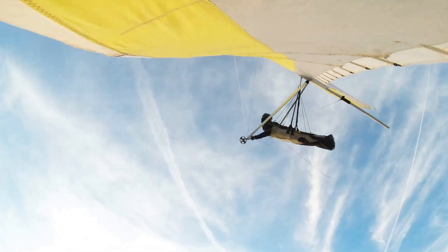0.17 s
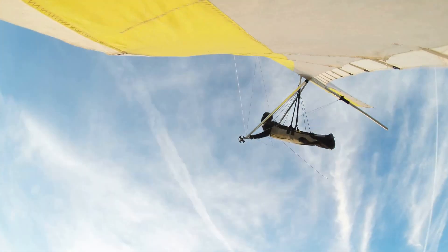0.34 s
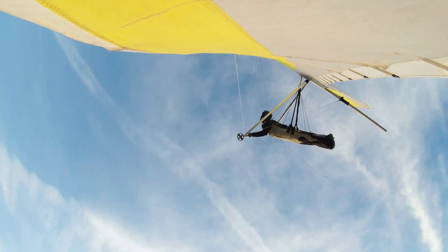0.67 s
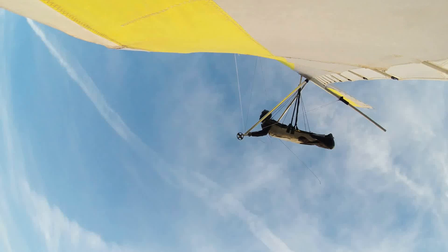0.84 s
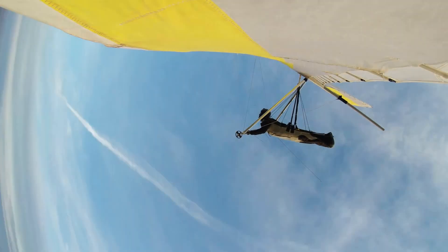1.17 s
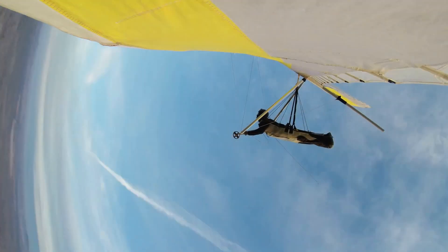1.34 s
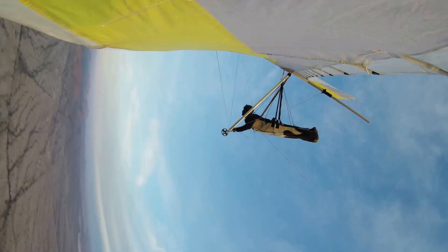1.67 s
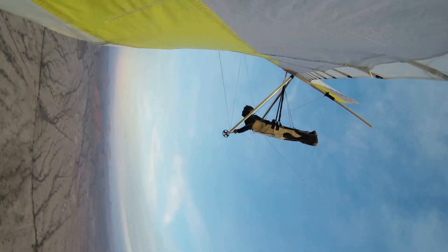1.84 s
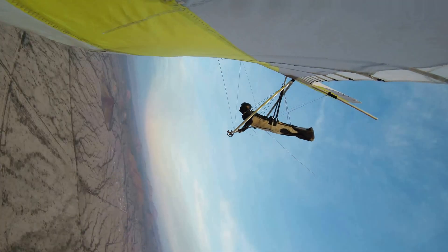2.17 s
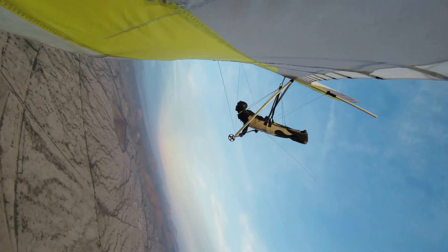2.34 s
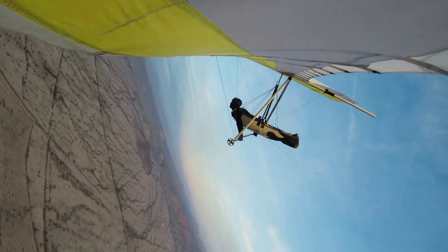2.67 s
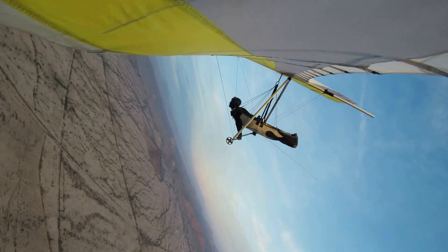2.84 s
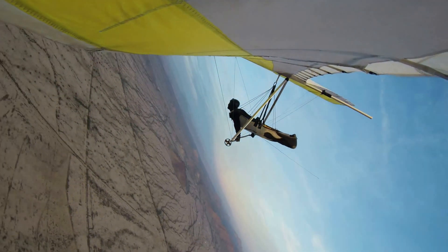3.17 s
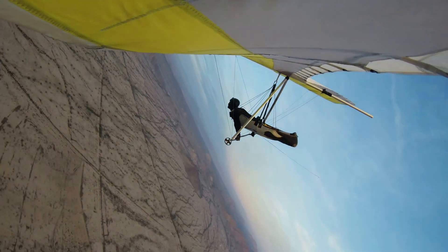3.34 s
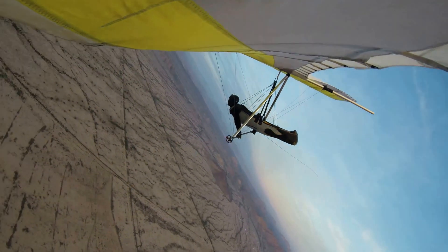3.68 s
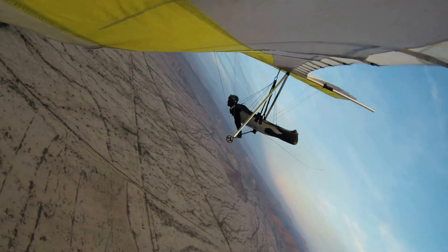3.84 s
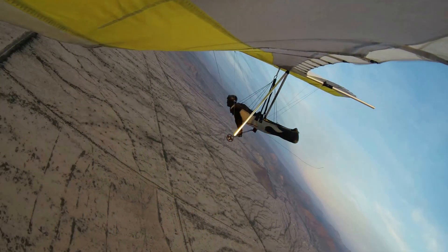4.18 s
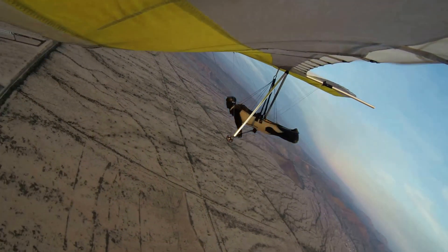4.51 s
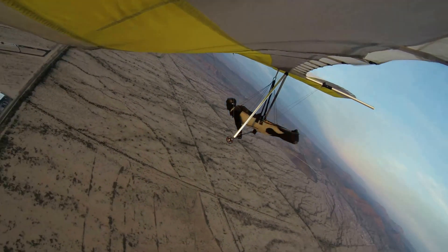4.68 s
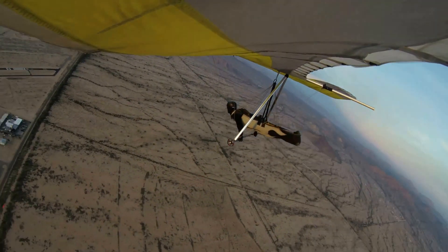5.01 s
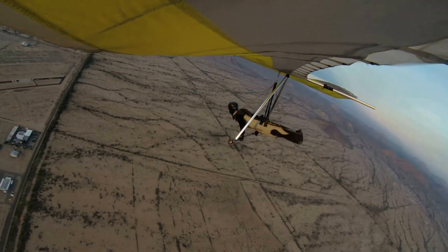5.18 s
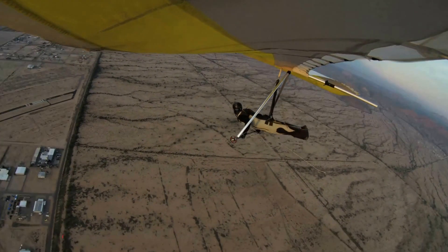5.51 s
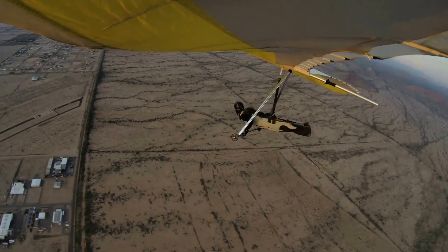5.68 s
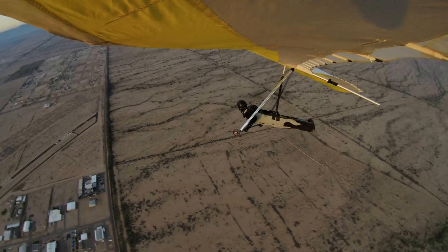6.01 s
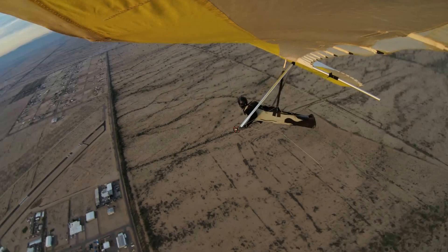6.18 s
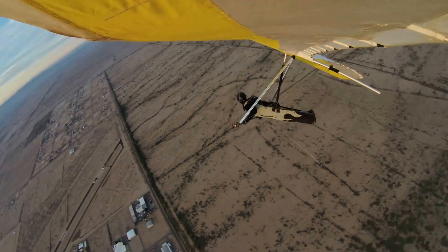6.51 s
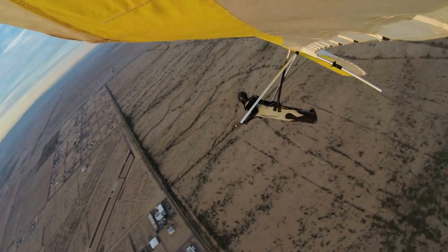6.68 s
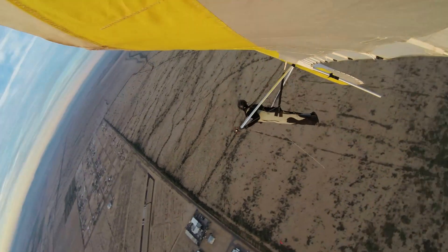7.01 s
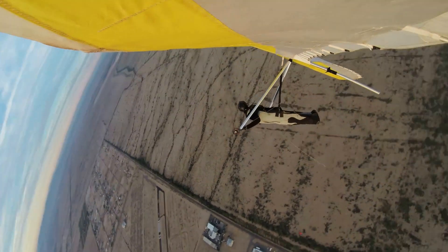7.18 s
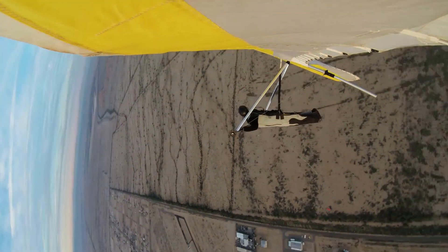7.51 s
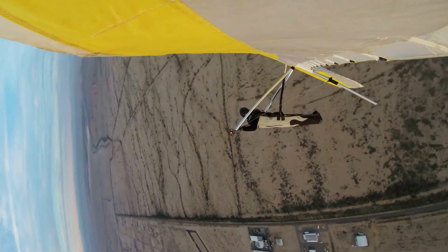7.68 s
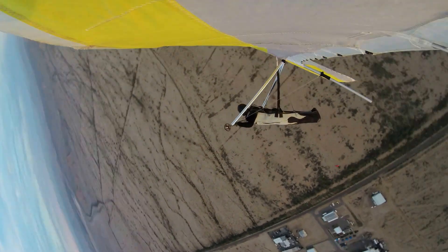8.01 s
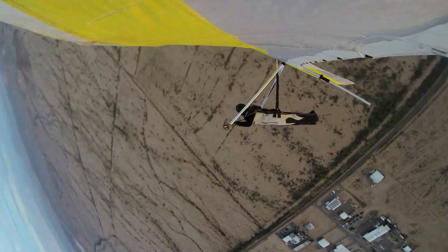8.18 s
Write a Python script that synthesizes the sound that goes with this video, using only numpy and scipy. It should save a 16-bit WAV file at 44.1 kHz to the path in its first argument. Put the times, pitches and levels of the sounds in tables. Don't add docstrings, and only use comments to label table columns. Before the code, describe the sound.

A continuous, close rush of wind on a housed camera fixed to a hang glider wing, with no distant ambience. From 0 to 1.2 s a rumbling, fluttering buffet and soft cloth noise ease down while the hiss thins. Around 1.3 s a hollow, leaky airflow comes forward and a thin, wavering two-toned whistle climbs, flickers, then sinks and vanishes by 1.9 s. The rush builds, jumping brighter at about 2.3 s, and the taut sail drums strongly from 2.7 s. From 3 to 6 s it is a dense, steady roar: deep frame throbbing, fast trailing-edge beating, humming cloth and gusty hiss, slightly easing after 3.5 s. A short low thump lands near 6.1 s. The sail drumming then fades, low pulses swell around 7.5 s, and from 7.8 s the hiss brightens over low throbbing until the end at 8.3 s.

```python
import sys
import numpy as np
from scipy import signal
from scipy.fft import rfft, irfft, next_fast_len
from scipy.io import wavfile
from scipy.ndimage import uniform_filter1d, minimum_filter1d, map_coordinates

SR = 44100
rng = np.random.default_rng(int(sys.argv[2]) if len(sys.argv) > 2 else 0)


def boost_factor(decibels):
    exponent = np.asarray(decibels, float) / 20
    return 10 ** exponent


def log_audio(samples):
    frames = np.atleast_2d(samples).T
    limited = np.clip(frames, -1, 1)
    pcm = np.round(limited * 32767).astype(np.int16)
    wavfile.write(sys.argv[1], SR, pcm)


N = 367794


def unit(x):
    return x / np.sqrt(np.mean(np.abs(x) ** 2) + 1e-20)


def curves(rows):
    s, *columns = np.transpose(rows)
    return [np.interp(np.arange(N) / SR, s, column) for column in columns]


def spells(rows):
    t = np.arange(0, N / SR + .01, .004)
    s, db, half_s = np.transpose(rows)[:, :, None]
    bells = db * np.exp(-((t - s) / half_s) ** 2)
    return np.interp(np.arange(N) / SR, t, bells.sum(axis=0))


def wobble(rate_hz):
    knots = rng.standard_normal(1500)
    return map_coordinates(knots, [np.arange(N) * rate_hz / SR])


def eddies(spectrum, patchy_db):
    z = signal.stft(rng.standard_normal(N), nperseg=512)[2]
    field = uniform_filter1d(rng.standard_normal(z.shape), size=6, axis=0)
    field = uniform_filter1d(field, size=6, axis=1)
    x = signal.istft(z * boost_factor(patchy_db * unit(field)), nperseg=512)[1][:N]
    m = next_fast_len(N + 8192)
    hz, db = np.transpose(spectrum)
    colour_db = np.interp(np.log(np.fft.rfftfreq(m, 1 / SR) + 1), np.log(hz + 1), db, -120, -120)
    return unit(irfft(rfft(x, m) * boost_factor(colour_db), m)[:N])


def shaken(hz, width_hz, lock):
    pole = np.exp(-np.pi * width_hz / SR)
    swing = rng.standard_normal(N + SR) + 1j * rng.standard_normal(N + SR)
    for _ in range(2):
        swing = signal.lfilter([1], [1, -pole], swing)
    swing = unit(swing[SR:])
    swing = swing / (np.abs(swing) + 0.25) ** lock
    carrier = np.exp(2j * np.pi * np.cumsum(hz * np.ones(N)) / SR)
    return unit(swing * carrier) * np.sqrt(2)


# time in seconds, strength in dB.
SHAKE = [(0, -18), (.5, -20), (.7, -26), (1.0, -27.5), (1.2, -27.5), (1.35, -27.5), (1.5, -22), (2.3, -20),
         (3.2, -20.5), (4.2, -21), (5.2, -20), (6.1, -21), (7.0, -20), (7.9, -20.5), (8.34, -23.5)]
# time in seconds, pitch in Hz.
BENDING = [(0, 66), (.75, 70), (1.1, 68), (1.55, 65), (1.75, 56), (2.0, 64), (2.2, 66), (2.8, 68),
           (3.3, 62), (5.2, 61), (6.5, 64), (7.3, 61), (8.34, 64)]
# centre in seconds, dB, half length in seconds.
BEND_SPELLS = [(.22, -4, 0.14), (.8, 6, 0.071), (1.0, 5, 0.12), (1.15, -16, 0.066), (1.55, 7.5, 0.044),
               (1.75, 5, .05), (2.25, 1, 0.2), (2.8, 7, 0.12), (3.74, 7, 0.072), (4.22, -13, 0.055),
               (4.5, 1, 0.053), (5.3, 3.5, .15), (2.6, -5, .04), (3.05, -5, 0.089), (4.75, -5, .08),
               (5.97, 6, 0.026), (6.15, 5, 0.063), (6.3, -11, 0.061), (6.55, 7, 0.041), (6.95, -20, 0.14),
               (7.27, 7.5, .07), (7.4, 6, .06), (7.53, 10.5, 0.06), (7.66, -2, .03), (7.78, 10, 0.066),
               (.15, -4, .07), (2.65, 5, .05), (4.47, 4.5, .05), (2.42, 1, 0.07), (2.53, 6.5, .04),
               (.4, -6, .08), (7.97, -21, 0.062), (8.18, 13, 0.29)]
# Hz, level in dB per Hz.
BUFFET = [(8, -16), (16, -8), (25, -6), (35, 1), (50, 5), (75, 1.5), (100, -4.5), (130, -41)]
# centre in seconds, dB, half length in seconds.
BUFFET_SPELLS = [(.1, 0.5, 0.2), (.42, -4, .1), (1.42, 3.5, .06), (6.04, -4, .03), (4.47, 4, .05),
                 (2.35, 0, .05), (1.6, -4.5, 0.11), (1.8, 6.5, 0.11), (2.2, 7, .1), (3.0, 3.5, .15),
                 (3.75, -6, 0.13), (4.25, -7, .1), (4.85, -5, .08), (5.75, -3, 0.073), (5.98, 8, .03),
                 (6.11, 16, 0.026), (6.85, 1, .1), (7.95, 7.5, 0.043), (8.15, 1.5, 0.16)]


def frame():
    shake_db, = curves(SHAKE)
    bend_db = shake_db - 2.0 + spells(BEND_SPELLS) + 0.5 * wobble(13.0)
    bend = boost_factor(bend_db) * shaken(*curves(BENDING), width_hz=5.2, lock=0.86).real
    buffet_db = shake_db - 1.5 + spells(BUFFET_SPELLS) + 1.7 * wobble(7.9)
    return boost_factor(buffet_db) * eddies(BUFFET, patchy_db=1.9) + bend


# time in seconds, rate in Hz.
BEAT = [(0, 39.5), (.6, 39), (1, 35.5), (1.5, 37.5), (1.9, 38), (2.15, 34.5), (2.6, 39.5), (3.3, 43),
        (4.5, 44.5), (5.7, 46), (6.5, 42), (7.5, 40.5), (8.34, 37)]
# centre in seconds, dB, half length in seconds.
FLAP_SPELLS = [(.25, 5, 0.22), (.39, -3, .06), (.66, -6, .05), (6.05, -5, .08), (2.9, -5, .1),
               (.85, -31, 0.24), (1.3, -2, .12), (1.9, 0, .08), (2.3, -5, 0.087), (2.7, -10, .05),
               (3.2, 4, .12), (3.9, 7.5, 0.099), (4.05, -6, 0.055), (4.7, 1, .08), (5.17, -5, .07),
               (5.4, 9, 0.15), (6.12, -2, .1), (6.6, -7, 0.074), (6.75, 1, .06), (7.8, 6, 0.26),
               (8.2, -14, 0.15)]
# centre in seconds, dB, half length in seconds.
OVERTONE_SPELLS = [(.15, -1, 0.12), (.45, 6.5, 0.23), (1.15, -12, 0.063), (1.3, 6, 0.046), (3.35, 4, 0.15),
                   (3.9, 2, 0.16), (4.9, 2.5, .2), (5.5, -2, 0.15), (1.9, 4, 0.067), (2.25, 0, 0.11),
                   (2.47, 7, 0.15), (3.07, -13, 0.066), (3.62, -19, 0.073), (5.2, -7, 0.048),
                   (6.0, -13, 0.045), (6.4, 5.5, 0.17), (6.74, 1.5, 0.044), (6.87, -12, 0.032),
                   (7.05, 3, 0.086), (7.8, -1.5, 0.25), (8.25, -1, 0.074)]


def flap():
    shake_db, = curves(SHAKE)
    stroke = shaken(*curves(BEAT), width_hz=3.4, lock=0.86)
    first_db = shake_db - 4.0 + spells(FLAP_SPELLS) + 1.6 * wobble(8)
    second_db = shake_db - 3.5 + spells(OVERTONE_SPELLS)
    return boost_factor(first_db) * stroke.real + boost_factor(second_db) * unit((stroke ** 2).real)


# time in seconds, strength in dB.
LOAD = [(0, -26), (.5, -30.5), (.7, -34), (1.2, -36.5), (1.35, -33), (1.6, -32), (2.25, -24.5),
        (2.8, -18.5), (3.4, -19), (3.65, -19.5), (4.6, -20), (5.9, -19), (6.6, -23), (7.15, -28),
        (7.45, -32), (8.0, -34), (8.34, -38)]
# time in seconds, low mode in Hz, high mode in Hz.
TENSION = [(0, 170, 205), (.5, 170, 208), (1.6, 168, 215), (2.0, 174, 215), (2.35, 156, 208),
           (2.6, 160, 192), (2.75, 168, 185), (2.95, 170, 206), (3.3, 172, 216), (4.1, 175, 220),
           (4.6, 175, 215), (4.95, 176, 227), (5.17, 174, 201), (5.7, 172, 227), (6.0, 170, 215),
           (6.5, 171, 215), (7.05, 170, 208), (7.8, 163, 210), (8.34, 165, 205)]
# centre in seconds, dB, half length in seconds.
LOW_DRUM_SPELLS = [(1.2, -6, .04), (1.6, 5, 0.27), (2.47, 2, 0.11), (2.73, -5, .07), (2.9, -3, 0.04),
                   (3.03, -4, .04), (2.19, -7, .08), (0.22, 2, .06), (4.72, -2.5, .08), (2.38, -6, 0.056),
                   (2.17, 9, 0.047), (7.87, 4, .04), (2.4, -5, .03), (3.15, -1, 0.066), (3.33, 7.5, 0.038),
                   (3.2, -12, 0.057), (3.44, 1.5, 0.12), (3.88, 4.5, 0.33), (3.8, -7, 0.069),
                   (4.3, -4, .06), (4.62, 2.5, 0.15), (4.85, -5, 0.055), (5.13, -5.5, 0.29),
                   (5.59, -6, 0.29), (5.87, 4.5, 0.054), (6.05, -20, 0.088), (6.9, 8, 0.077),
                   (7.13, 6.5, 0.046), (7.43, -12, 0.072), (7.83, 6, 0.11)]
# centre in seconds, dB, half length in seconds.
HIGH_DRUM_SPELLS = [(.08, -10, 0.084), (.45, 11, 0.044), (2.0, -6, 0.17), (2.75, 7, 0.082),
                    (2.86, -1, 0.027), (2.95, 6, 0.037), (3.01, -10.5, 0.032), (3.08, 2, .04),
                    (3.22, 5, 0.026), (.22, 3, .06), (7.6, 3.5, 0.046), (8.14, -6, .06), (2.72, -3.5, .04),
                    (3.14, -3, .03), (3.45, 2, .06), (6.45, -3, 0.067), (5.2, 0, 0.072), (7.45, -4, .06),
                    (3.3, 3.5, 0.17), (3.6, -8.5, 0.081), (4.0, -10, 0.055), (4.15, 4, 0.19),
                    (4.55, -3, 0.13), (4.85, 4.5, 0.024), (5.05, -5.5, 0.066), (5.22, 8, 0.035),
                    (5.42, -5, 0.05), (5.72, 5, 0.044), (5.86, 3, 0.033), (6.02, 8.5, 0.066),
                    (6.3, 3, 0.14), (6.5, 4, 0.096), (7.45, -4, 0.092), (6.95, -10, 0.037),
                    (7.05, 13, 0.039), (7.9, -6, 0.19)]
# centre in seconds, dB, half length in seconds.
CLOTH_SPELLS = [(.1, 8, 0.29), (0.78, -2, 0.17), (1.23, -2, 0.39), (1.8, 0, 0.14), (2.16, -2, 0.11),
                (2.5, 3.5, 0.074), (2.77, 3, .08), (4.5, 4.5, .1), (6.35, -3.5, 0.12), (7.3, 2.5, .08),
                (2.6, 2, 0.072), (3.33, 4, 0.074), (3.7, -0.5, 0.45), (5.6, 1.5, 0.16), (5.32, 1, 0.23),
                (6.0, -10, 0.11), (7.2, 0.5, 0.22), (8.34, 5.5, 0.15), (8.12, -2, 0.073), (6.5, -1, .06),
                (5.2, 2.5, .08), (.03, -3.5, .06)]
# Hz, level in dB per Hz.
FLUTTER = [(56, -29), (95, -5.5), (124, -7), (157, -5), (204, -3.5), (232, -9.5), (260, -18), (340, -32.5),
           (570, -120)]
# Hz, level in dB per Hz.
RUSTLE = [(150, -15.5), (250, -3), (264, -9.5), (301, -14), (349, -5.5), (410, -19.5), (620, -23.5),
          (810, -54), (1360, -120)]


def sail():
    load_db, = curves(LOAD)
    loose_db = spells(CLOTH_SPELLS)
    low_hz, high_hz = curves(TENSION)
    low_db = load_db - 0.5 + spells(LOW_DRUM_SPELLS)
    high_db = load_db - 1.25 + spells(HIGH_DRUM_SPELLS)
    drum = boost_factor(low_db) * shaken(low_hz, width_hz=13.6, lock=0.7).real
    drum += boost_factor(high_db) * shaken(high_hz, width_hz=20.4, lock=0.42).real
    flutter_db = -25.0 + 0.6 * (load_db + 26.5) + 0.92 * loose_db + 1.1 * wobble(4.9)
    rustle_db = -38.5 + 0.74 * (load_db + 25.5) + 0.96 * loose_db + 1.0 * wobble(11)
    flutter = boost_factor(flutter_db) * eddies(FLUTTER, patchy_db=-2.0)
    rustle = boost_factor(rustle_db) * eddies(RUSTLE, patchy_db=0.7)
    return drum + flutter + rustle


# Hz, level in dB per Hz.
SURGE = [(6, -20), (16, -9), (25, -1), (31, -1), (40, -29)]


def wake():
    shake_db, = curves(SHAKE)
    return boost_factor(shake_db - 14.5 + 1.5 * wobble(5)) * eddies(SURGE, patchy_db=-1.0)


# time in seconds, vortex rush in dB, airspeed as fine fizz in dB, door seam leak in dB.
FLOW = [(0, -29.5, -58.5, -2.5), (.12, -28, -57, -5), (.45, -31, -61, -2), (.7, -32.5, -66, -1),
        (.97, -33, -66.5, 2), (1.17, -32, -64, 3), (1.3, -32, -61, 4.5), (1.4, -31.5, -58.5, 5.5),
        (1.55, -27.5, -57, 3), (2.31, -24.5, -49, 1.5), (2.335, -22, -52, 2), (2.8, -22.5, -53, -1.5),
        (2.87, -25.5, -53.5, -2.5), (3.44, -25, -52, 2.5), (3.475, -28.5, -55.5, 1.5),
        (4.1, -26.5, -53.5, 0), (5.85, -26.5, -54, -1.5), (6.2, -28, -55, -2), (6.7, -27.5, -52.5, -0.5),
        (7.1, -28, -51, 1.5), (7.66, -30, -53, 4), (7.79, -25, -50.5, -1), (8.34, -24, -48, 0.5)]
# centre in seconds, dB, half length in seconds.
GUSTS = [(.66, -0.5, 0.016), (1.07, 2, 0.07), (1.2, 0, .05), (1.78, 3, 0.033), (2.18, -0.5, 0.046),
         (2.305, -3.5, 0.025), (2.45, -0.5, 0.033), (3.27, 1.5, 0.057), (3.49, -2.5, 0.026),
         (3.61, 2, .015), (3.68, 3, .015), (3.88, -2, 0.045), (3.97, 1.5, .04), (4.25, -1, 0.065),
         (4.55, 0.5, .03), (5.35, -3.5, 0.025), (5.6, -1.5, 0.022), (6.65, 0.5, .08), (7.01, -1.5, .015),
         (7.11, 3, .015), (7.94, -2, .01), (8.0, 1, .015), (5.07, -3, 0.026), (5.13, 4, 0.02),
         (5.55, 0.5, 0.025), (5.7, 1, 0.061), (5.9, -1.5, 0.028), (5.97, 3.5, 0.021), (6.12, 0, 0.031),
         (7.62, -5, 0.011), (8.11, 3.5, 0.033), (8.235, -3, 0.025), (8.29, -0.5, 0.015)]
# centre in seconds, dB, half length in seconds.
EDGE_SPELLS = [(.25, 1, 0.16), (.8, 1, 0.22), (1.25, -1.5, 0.1), (2.0, -0.5, 0.51), (4.25, -1, .1),
               (5.3, 0.5, .1), (6.5, 0, .1), (6.75, 0, .1), (5.75, 1, 0.087), (7.3, 0.5, .2)]
# Hz, level in dB per Hz.
RUSH = [(1180, -20.5), (2000, -9.5), (2160, -3.5), (2360, 4), (2830, -0.5), (3060, -2), (3480, 0),
        (3800, -12), (4940, -48), (8360, -120)]
# Hz, level in dB per Hz.
EDGE = [(2210, -37), (3750, -3.5), (4170, -3.5), (4930, -2.5), (5250, -7.5), (6240, -3), (6950, -18),
        (9040, -46), (15300, -120)]
# Hz, level in dB per Hz.
FIZZ = [(4060, -43), (6900, -7.5), (7170, -3), (8040, -8.5), (8800, -6), (9520, -10.5), (10100, -3.5),
        (10400, -3), (11300, -15.5), (12600, -9.5), (15000, -29)]


def flow():
    rush_db, speed_db, _ = curves(FLOW)
    swell_db = spells(GUSTS) + 0.15 * wobble(9)
    edge_db = -40.0 + 0.65 * (rush_db + 27) + 0.41 * (speed_db + 53.5)
    edge_db += 0.76 * swell_db + spells(EDGE_SPELLS)
    fizz_db = speed_db + .3 + 0.61 * swell_db
    quick_db = 0.15 * wobble(22) + 0.72 * wobble(60) + 0.78 * wobble(110)
    rush = boost_factor(rush_db + swell_db + 0.86 * quick_db) * eddies(RUSH, patchy_db=0.15)
    edge = boost_factor(edge_db + 0.57 * quick_db) * eddies(EDGE, patchy_db=0.5)
    fizz = boost_factor(fizz_db + 0.76 * quick_db) * eddies([*FIZZ, (15350, -27)], patchy_db=1.0)
    return rush + edge + fizz


# centre in seconds, dB, half length in seconds.
SEAM_PUFFS = [(1.67, -0.5, .03), (2.9, 4, 0.069), (3.21, 2.5, 0.019), (3.83, -3, 0.045), (4.02, 1.5, 0.032),
              (4.6, -2, .03), (4.78, 1.5, .03), (5.39, 2.5, 0.044), (5.8, 3, 0.045), (6.1, -0.5, .05),
              (.2, 1.5, 0.087), (1.45, -1, 0.073), (1.95, 1, .06), (2.4, -1, .05), (4.45, 2.5, 0.043),
              (4.68, -1.5, 0.034), (4.95, 2.5, 0.054), (5.15, 0.5, .05), (6.25, 2.5, .04), (6.8, 2, .05),
              (7.4, 0, .05), (7.9, 0, .08)]
# Hz, level in dB per Hz.
UPPER = [(680, -25), (1150, -12), (1410, 0), (1580, -2), (2050, -6.5), (2660, -15), (4510, -120)]
# Hz, level in dB per Hz.
HOLLOW = [(350, -8), (600, -9), (763, -1.5), (933, -6.5), (1120, -12.5), (1180, -29), (1530, -16),
          (2600, -120)]


def cavity():
    rush_db, speed_db, leak_db = curves(FLOW)
    load_db, = curves(LOAD)
    puffs_db = 0.41 * spells(GUSTS) + spells(SEAM_PUFFS) + 0.52 * wobble(14)
    upper_db = -31.5 + 1.17 * (rush_db + 27) + 0.19 * (speed_db + 55) + leak_db + puffs_db
    lower_db = -38.5 + 0.16 * (rush_db + 27.5) + 0.52 * (speed_db + 54) + 0.31 * (load_db + 24)
    lower_db += 0.2 * leak_db + 0.41 * puffs_db
    upper = boost_factor(upper_db) * eddies(UPPER, patchy_db=0.74)
    return upper + boost_factor(lower_db) * eddies(HOLLOW, patchy_db=1.27)


def port():
    speed_db = curves(FLOW)[1]
    port_db = -71 + .25 * (speed_db + 55) + .8 * wobble(25)
    colour = [(9700, -40), (10100, -4), (10350, 0), (10600, -5), (11000, -40)]  # Hz, dB per Hz
    return boost_factor(port_db) * eddies(colour, patchy_db=1)


# time in seconds, pitch in Hz, level in dB.
WHISTLES = [
    [(1.27, 2330, -55), (1.3, 2360, -33), (1.335, 2540, -35), (1.385, 2620, -31), (1.405, 2720, -38),
     (1.43, 2810, -33), (1.47, 2720, -45), (1.495, 2740, -32), (1.52, 2840, -31), (1.54, 2770, -32),
     (1.57, 2820, -40), (1.65, 2800, -38), (1.7, 2780, -52)],
    [(1.33, 3050, -55), (1.37, 3150, -39), (1.4, 3230, -40), (1.425, 3310, -35), (1.445, 3260, -37),
     (1.465, 3320, -32), (1.49, 3460, -34), (1.52, 3400, -44), (1.555, 3490, -34), (1.59, 3480, -39),
     (1.62, 3620, -37), (1.69, 3640, -39), (1.73, 3630, -55)],
    [(1.2, 7600, -75), (1.4, 7700, -69), (1.7, 7650, -64), (2.2, 7650, -64), (2.4, 7640, -75)],
    [(1.66, 2780, -52), (1.7, 2720, -36), (1.74, 2590, -38), (1.8, 2590, -35), (1.83, 2400, -40),
     (1.86, 2320, -33), (1.89, 2450, -36), (1.94, 2450, -52)],
]
WHISTLE_WIDTHS_HZ = [60, 65, 220, 70]


def whistle():
    tones = 0
    for rows, width_hz in zip(WHISTLES, WHISTLE_WIDTHS_HZ):
        hz, db = curves(rows)
        sounding = (db > db[0]) | (db > db[-1])
        wavering_hz = hz * (1 + .003 * wobble(60))
        tone = shaken(wavering_hz, width_hz, lock=.95).real
        tones = tones + sounding * boost_factor(db + 1.8 * wobble(50)) * tone
    return tones


# centre in Hz, width in Hz, gain in dB.
HOUSING = [(746, 51, 2.5), (2830, 46, 4.5), (3810, 78, -2.5), (3976, 64, 6.5), (4030, 73, -5),
           (4910, 99, 3.5), (5040, 110, -1), (5580, 130, 1.5), (5900, 110, -3.5), (6060, 140, 3),
           (6630, 150, 4), (14700, 500, 9)]


def housing(air):
    f = np.fft.rfftfreq(N, 1 / SR)
    wall_db = sum(db * np.exp(-((f - hz) / width_hz) ** 2) for hz, width_hz, db in HOUSING)
    return irfft(rfft(air) * boost_factor(wall_db), N)


def scene():
    structure = frame() + flap() + sail() + wake()
    air = flow() + cavity() + whistle()
    return (structure + housing(air) + port())[None]


def roll_off(x):
    return signal.sosfilt(signal.butter(12, 15180, fs=SR, output="sos"), x)


def record(dry):
    threshold_db, hold_s, ramp_s, start_s = -3.0, .012, .006, .0015
    over = np.minimum(1, (boost_factor(threshold_db) / (np.abs(dry) + 1e-9)) ** 0.49)
    hold, ramp = int(hold_s * SR), int(ramp_s * SR)
    held = minimum_filter1d(over, hold, origin=(hold - 1) // 2)
    gain = uniform_filter1d(held, ramp, origin=(ramp - 1) // 2)
    x = dry * gain * np.minimum(1, np.arange(N) / SR / start_s)
    x = 1.3 * np.tanh(x / 1.3)
    return roll_off(x)


dry = scene()
out = record(dry)
log_audio(out)
```